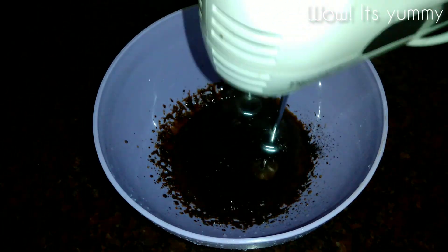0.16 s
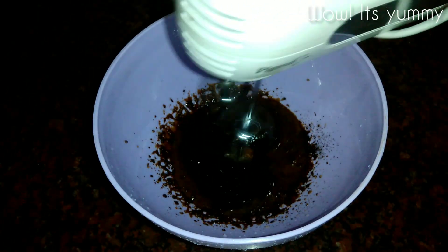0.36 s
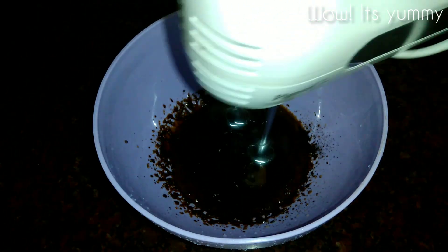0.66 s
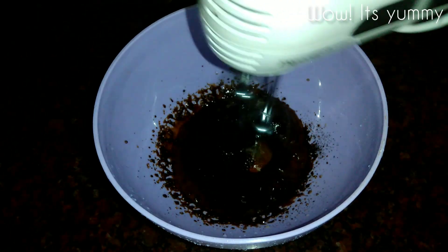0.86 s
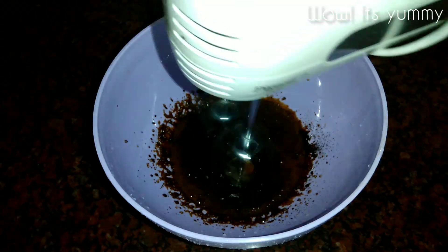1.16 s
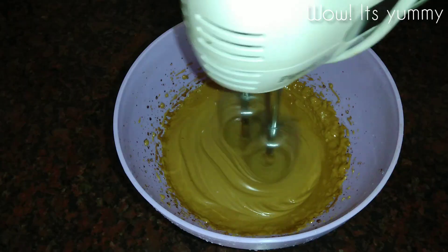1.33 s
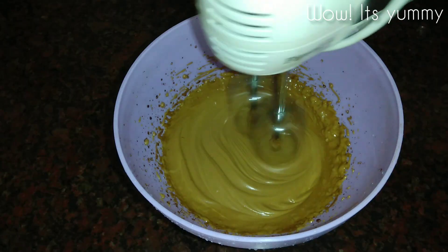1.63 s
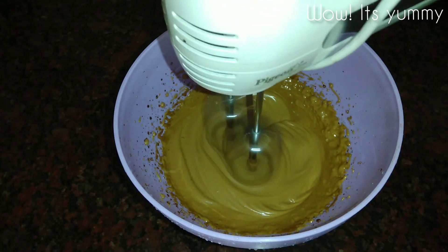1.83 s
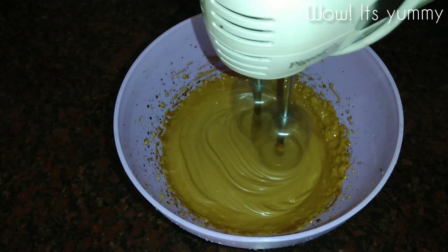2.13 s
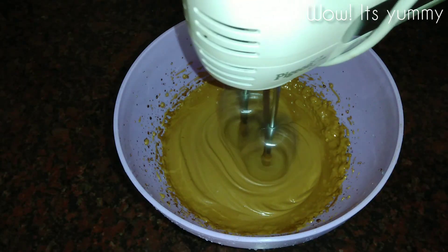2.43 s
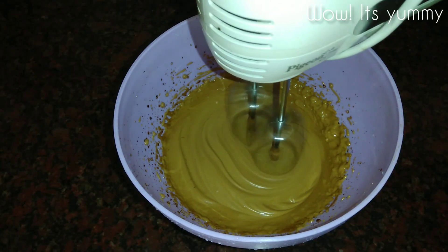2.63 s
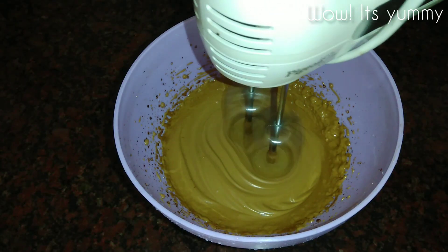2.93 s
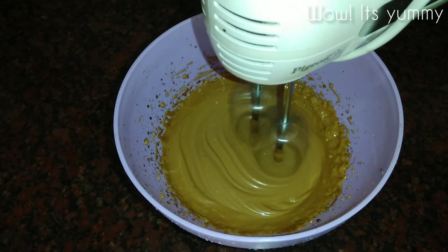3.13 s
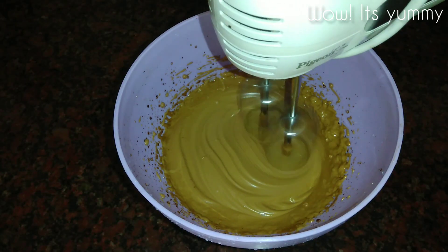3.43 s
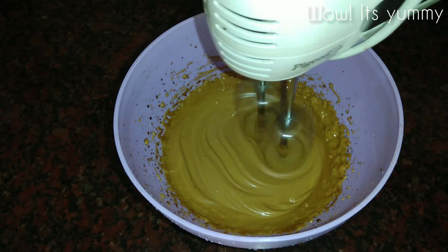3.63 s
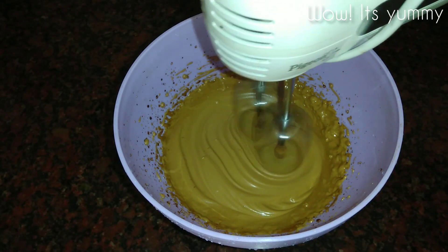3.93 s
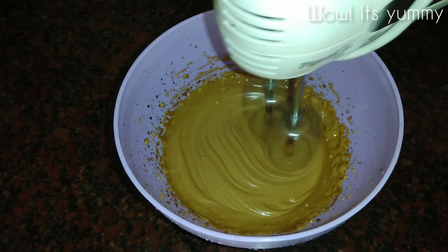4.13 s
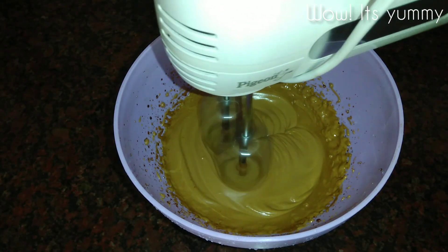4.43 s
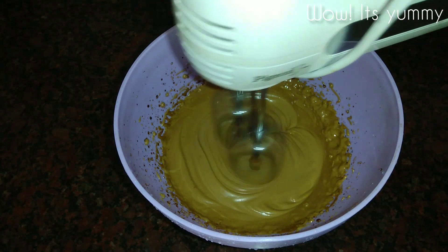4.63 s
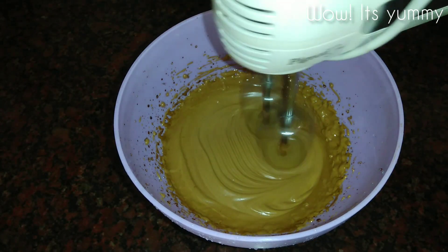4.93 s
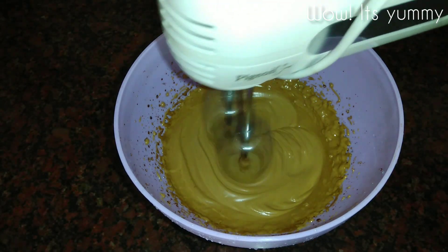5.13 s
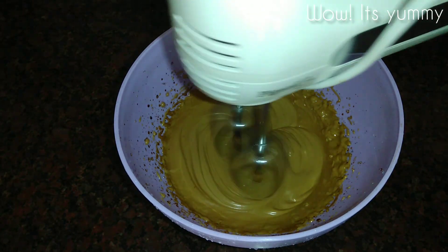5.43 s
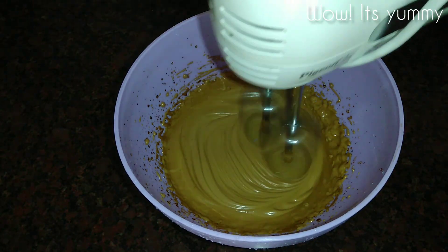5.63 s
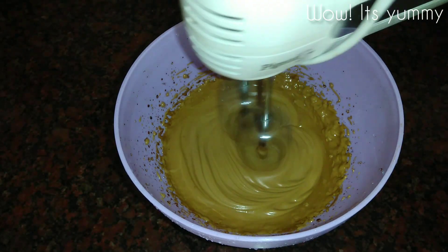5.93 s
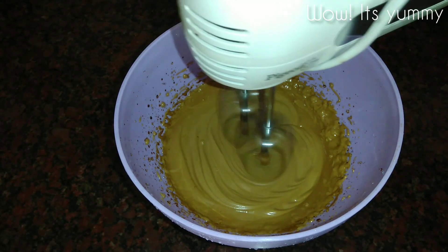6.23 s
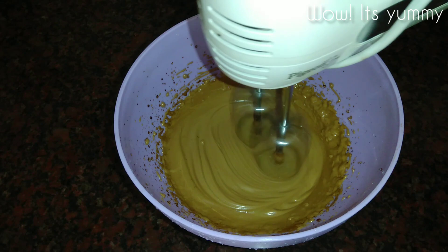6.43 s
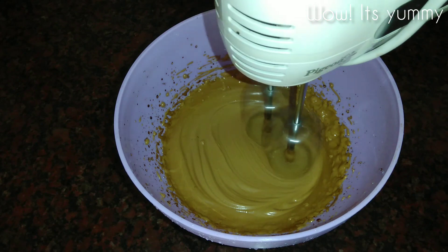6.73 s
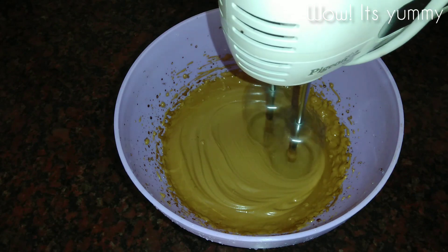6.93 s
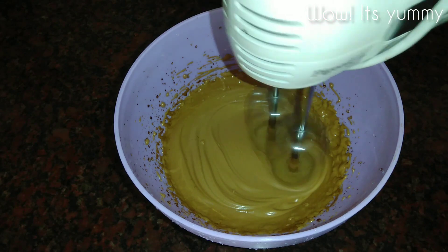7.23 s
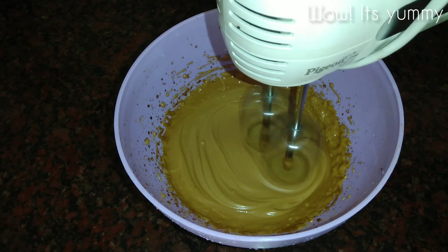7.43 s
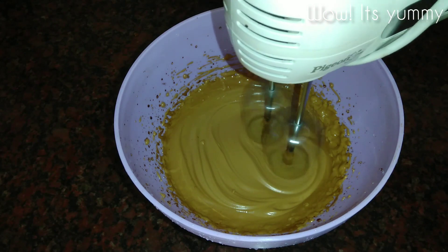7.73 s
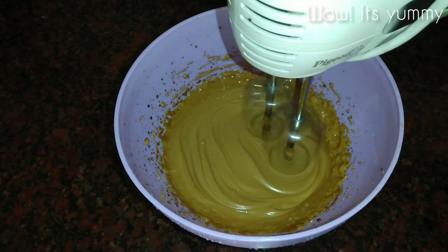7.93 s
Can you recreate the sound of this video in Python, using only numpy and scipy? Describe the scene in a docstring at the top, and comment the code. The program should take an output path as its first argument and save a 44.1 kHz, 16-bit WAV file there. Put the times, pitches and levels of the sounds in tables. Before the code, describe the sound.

From 0 to 1.19 s an electric hand mixer runs at low speed, close and dry in stereo: a soft motor drone near 272 Hz, gritty gear rattle and wet sloshing that surges several times a second, with small bubbly slaps. Beater wires knock on the plastic bowl in short hard ticks, strongest in a chattering cluster around 1.04 s. It cuts to near silence until about 1.27 s. Then the mixer fades in within a quarter second at top speed, far louder and brighter: a piercing, steady whine near 429 Hz with strong harmonics, throbbing about twenty times a second, dense gear buzz, airy brush hiss and low foam churn. Pitch barely sags; tone colour swells gently as the mixer moves. At 7.3 s a dull thud and faint click switch it off; the whine glides downward, hiss and buzz fading, still slowing at the end around 8 s.

```python
"""An electric hand mixer in a bowl, close by: rotor harmonics, gear clatter and brush hiss follow its rotor speed.
At low speed the beaters splash through thin liquid, heard as droplet-modulated noise and ringing air pockets,
and knock on the plastic bowl, heard as ticks and decaying modes. After a short silence it whips thick foam
at top speed with a bright throbbing whine, then is switched off and coasts down.
Steady motor hum, a switch thud and click, and a very faint noise floor complete the scene."""
import sys
import numpy as np
from scipy import signal
from scipy.fft import rfft, irfft, next_fast_len
from scipy.io import wavfile

SR = 44100
rng = np.random.default_rng(int(sys.argv[2]) if len(sys.argv) > 2 else 0)


def wav_record(signal):
    """Record a signal, one row per channel, as 16-bit PCM in the file named by sys.argv[1]."""
    frames = np.transpose(np.atleast_2d(signal))
    bounded = np.clip(frames, -1, 1)
    # unit amplitude maps onto the largest positive 16-bit level
    quanta = np.round(bounded * 32767).astype(np.int16)
    wavfile.write(sys.argv[1], SR, quanta)


N = 355870
TIME = np.arange(N) / SR

# rotor speed at top speed while powered, sagging where the foam drags: time_s, turns_hz
FAST_SPEED = [(1.27, 428.9), (1.68, 429.4), (2.04, 428.4), (3.66, 430.0), (4.38, 429.4), (4.6, 427.4),
              (5.1, 427.7), (5.55, 426.3), (6.18, 427.5), (6.5, 428.8), (6.95, 429.6), (7.08, 423.7),
              (7.33, 412)]
# strong rotor harmonics at free speed: multiple, level_db, load_db, place_db (per unit to the right), off_db,
# left_minus_right_db, load_pan_db, place_pan_db, left_lead_rad, throb_share, throb_lead_rad
STRONG_TONES = [(1, -42.5, 1.5, 2.1, -0.5, 8.5, -1.7, -0.5, 0.2, 0.078, 0.45),
                (2, -52.5, 1, -1, -9, -5.5, 4, -1.5, -2, 0.2, -2.3),
                (3, -43.5, -0.5, 0, -15, -8, -3, 6.5, 1.5, 0.25, -1.9),
                (4, -41, -2.5, 0.5, -15, 4.5, 0, 2, 1.0, 0.26, 0.53),
                (5, -49, 1, -1.5, -3.5, 11, -5, 2, 0.7, 0.23, 2.8),
                (6, -66, 2, 5, 10, 5, 0, -3, 0.5, 0.079, -0.42),
                (7, -47.5, 0, 0, -6, 4.5, 6, -.5, 0.5, 0.14, 1.8),
                (8, -51.5, 6, -2.5, 2.5, 0.2, 2.5, -1, 4, 0.052, -0.41)]
# swelling of the second harmonic as the mixer moves: time_s, gain_db
SECOND_SWELL = [(1.8, -13), (2.05, 4), (2.4, -7), (3.2, -0.5), (3.7, 3), (4.15, -1), (4.85, 4), (5.35, 3.5),
                (5.7, 7.5), (6.1, 5), (6.5, -4), (6.95, 1), (7.25, 7.5)]
# swelling of the third harmonic: time_s, gain_db
THIRD_SWELL = [(2.3, 0), (2.8, -2.5), (3.5, -2), (3.8, -3), (4.5, -1.5), (5.1, 2.5), (5.5, -1.5), (5.95, 3),
               (6.3, -1.5), (6.9, -3.5), (7.15, 3.5)]
# swelling of the seventh harmonic: time_s, gain_db
SEVENTH_SWELL = [(1.6, 0), (2.1, 0.5), (3.1, 1), (4.4, -1), (4.75, -11), (5.1, -1), (5.5, -23), (5.9, 0.5),
                 (6.25, -6), (6.5, 0), (6.9, -3), (7.2, -1)]
# weak top-speed harmonics, relative to the brush work level: multiple, relative_db, left_minus_right_db, left_lead_rad
WEAK_TONES = [(9, -17, -3, 1.5), (10, -18.5, -3, 1.44), (11, -22, 19, 1.8), (14, -18.5, -13, 1.4),
              (18, -15.5, 4, -1.1), (24, -9, -23, 2.3)]
# housing resonances and dips that tones slide through: centre_hz, width_hz, gain_db
HOUSING_MODES = [(246, 6, -10), (275, 20, 4), (294, 7, -10), (400, 7, -13), (419, 6, -15), (830, 18, 4),
                 (1256, 32, 7), (1640, 110, 5), (1930, 70, 7), (2050, 70, -4), (2600, 200, 7.5),
                 (2790, 60, -6), (2920, 70, -7), (3230, 120, 3)]
# place of the mixer in the bowl, negative left and positive right: time_s, place (no unit)
MIXER_PLACE = [(1.27, -2), (1.5, 0.14), (1.85, -1.5), (2.15, 0.013), (3, 0.32), (3.4, 0.92), (4.1, 0.5),
               (4.55, -0.036), (4.8, -0.084), (5.05, 0.38), (5.3, -0.13), (5.75, 1), (6.05, -0.9),
               (6.6, 0.074), (7, 0.59), (8, 0.24)]
# noises in the foam by part: base_level_db, load_db, loss_per_speed_halving_db, unevenness_db
FOAM_WORK_LEVELS = {"churn": (-47, 0.5, 8.5, 0.6), "gears": (-41.5, 0.54, 15.5, 0.74),
                    "brushes": (-42, -0.5, 26, 0.2), "bearings": (-43, 0.7, 28, 1.06)}
# gear spectrum, driven at top speed: frequency_hz, relative_level_db
FAST_GEAR_SPECTRUM = [(500, -15), (1000, 1), (1300, 3.5), (1500, 2.5), (1700, 8), (1950, 1), (2300, 3.5),
                      (2800, 3), (3300, 4), (3600, -10), (4100, -27), (8000, -49)]
# gear spectrum after switch-off: frequency_hz, relative_level_db
COASTING_GEAR_SPECTRUM = [(500, -14), (1000, -2), (1300, 2), (1650, 6), (2000, 4.5), (2550, 6),
                          (3100, -1.5), (4100, -3), (8000, -48)]
# brush spectrum at top speed: frequency_hz, relative_level_db
FAST_BRUSH_SPECTRUM = [(3000, -28), (4600, -32), (6500, -14), (7500, -15), (8600, -11.5), (9300, -4),
                       (10500, -2), (11500, -2), (12500, -5), (13600, -8.5), (14100, -10), (15200, -9.5),
                       (16000, -15)]
# bearing spectrum at top speed: frequency_hz, relative_level_db
BEARING_SPECTRUM = [(1500, -16), (3000, 1.5), (3800, 3), (4350, -4), (4900, 5), (5700, -1), (6800, 0.5),
                    (8200, 1), (9200, -1.5), (11000, -18), (16000, -31)]
# rough bearing tones between the rotor harmonics: multiple, width_hz, relative_db
RING_TONES = [(4.455, 6, -62), (7.4, 70, -60), (8.57, 70, -61), (11.5, 70, -65), (12.5, 60, -69),
              (14.5, 70, -66)]
# churning foam spectrum: frequency_hz, relative_level_db
FOAM_SPECTRUM = [(20, -47), (60, -26), (120, -14.5), (180, -2), (260, -2), (370, 7.5), (520, 6), (750, 3.5),
                 (1000, -4), (1500, -8), (3000, -15.5)]
# rotor speed in the liquid: time_s, turns_hz
SLOW_SPEED = [(0, 271), (.2, 272), (.35, 271.8), (.5, 273.1), (.8, 273.6), (.95, 274.9), (1.19, 273.3)]
# rotor harmonics at low speed: multiple, level_db, left_minus_right_db, left_lead_rad
SLOW_HARMONICS = [(1, -49, 3, 0), (6, -53.5, -1, .1), (7, -61, 0, -.5), (8, -61, 0, -1.8), (12, -64, 7, -2),
                  (36, -64, -5, -1.3)]
# surges as the beaters sweep through the pool: hold_start_s, hold_length_s, churn_lift_db, rattle_lift_db
POOL_SURGES = [(0.0, 0.092, 6.5, 1.5), (0.18, 0.081, 7, 3.5), (0.325, 0.017, 5, 1), (0.403, 0.11, 6.5, 2),
               (0.579, 0.029, 9.5, 5), (0.67, 0.047, 7.5, 6), (0.76, 0.058, 5, 3.5), (0.82, 0.051, 6.5, -1),
               (0.927, .03, 4, -3), (1.04, 0.063, 10.5, 5.5), (1.137, 0.046, 9.5, 3)]
# splashing liquid spectrum: frequency_hz, relative_level_db
LIQUID_SPECTRUM = [(20, -37), (50, -31), (75, -21), (130, -21), (235, -13), (310, -3.5), (560, -6.5),
                   (780, -5), (1000, -11), (1300, -22), (2500, -27.5)]
# gear spectrum at low speed: frequency_hz, relative_level_db
SLOW_GEAR_SPECTRUM = [(100, -41), (500, -19), (1150, -5.5), (1620, 3), (1900, 3), (2200, 3), (2700, -5),
                      (3300, -2), (4500, -43), (6000, -22), (9000, -13.5)]
# brush spectrum at low speed: frequency_hz, relative_level_db
SLOW_BRUSH_SPECTRUM = [(150, -25), (1000, 0), (2500, 4), (4500, -1), (6500, -4), (8300, -7), (9900, 1),
                       (11300, 3), (12500, -13), (13300, 0), (14500, -18), (16000, -10)]
# liquid thrown against the wall: start_s, relative_db, starting_pitch_hz
LIQUID_SLAPS = [(0.063, -24, 536), (0.189, -32, 810), (0.212, -29, 864), (0.244, -28, 740),
                (0.331, -25, 740), (0.381, -35, 730), (0.403, -22.5, 726), (0.428, -21.5, 725),
                (0.447, -24, 530), (0.593, -26, 670), (0.604, -35, 560), (0.678, -26, 480),
                (0.687, -26, 555), (0.71, -22, 560), (0.737, -24, 475), (0.842, -29, 576),
                (0.865, -29, 575), (0.941, -27, 750), (1.095, -24, 950), (1.177, -34, 727)]
# beater knocks on the bowl: start_s, ring_peak_db, tick_relative_db
BEATER_KNOCKS = [(.0847, -31, -12), (.2448, -28, -18), (.4065, -29.5, -14), (.4633, -31, -14),
                 (.4728, -29, -15), (.524, -35, -12), (.604, -30, -12), (.6799, -28, -18), (.689, -32, -13),
                 (.7612, -32, -13), (.7951, -32, -9), (.805, -32, -4), (1.0351, -20.5, -11),
                 (1.0386, -22.5, -15), (1.0521, -26, 0), (1.0552, -30, -4), (1.058, -34, 2),
                 (1.064, -36, -1), (1.0958, -25, -17), (1.103, -33, -15), (1.117, -33, -18),
                 (1.1783, -29, -1)]
# modes of the bowl and beater wire: frequency_hz, relative_db, t60_s
BOWL_MODES = [(496, -15, 0.06), (734, -9, 0.055), (1100, -11, .03), (1700, -5, .024), (2165, -2, 0.028),
              (2514, 0, 0.026), (3031, -6, 0.025), (4048, -15, 0.035), (4667, -15, 0.036),
              (6584, -24, 0.04), (11000, -14, .012)]
# steady tones of motor iron and housing: pitch_hz, width_hz, slow_level_db, fast_base_level_db, off_db
HUM_TONES = [(100.3, 2, -85, -79.5, -9), (200.6, 2.3, -60.5, -72, -10), (575.6, 22, -52.5, -57.5, 0)]
# likeness of left and right: frequency_hz, correlation
STEREO_LIKENESS = [(30, 0.067), (130, 0.7), (290, 0.84), (640, 0.034), (1410, 0.28), (3100, 0.43),
                   (7000, 0.15), (15000, 0.037)]

SLOW_END_S, FAST_START_S = 1.189, 1.266
FADE_FROM_S, FADE_S = 1.243, 0.24  # the top-speed sound fades in
FREE_HZ, SAG_HZ = 429.4, 2.16  # free-running speed, and the sag that means full load
OFF_S, COAST_PER_S, RELEASE_S = 7.33, 0.707, 0.21  # power off, slowing rate, dying of the magnetic whine
SWITCH_S, THUD_DB, CLICK_DB = 7.312, -55, -36
STROKES_PER_S = 8  # how often the drag on the beaters changes
WHINE_DB_PER_HALVING, WHINE_WANDER_DB, WANDERS_PER_S = 20.5, 0.7, 5
SMEAR_RAD = 0.086  # the housing delays the tones unequally, which blunts the pulse of each turn
CALM_CHURN_DB, CALM_GEARS_DB, CALM_BRUSHES_DB = -48, -47, -44  # between surges
SURGE_ATTACK_S, SURGE_RELEASE_S = 0.021, 0.048
BRUSH_SHARE = 0.21  # how far the brush hiss follows the rattle
CONTACT_S, TICK_S, CHATTER_PER_S = 0.0003, 0.0014, 240  # wire pressing on the bowl, tick decay, bounce rate
LEFT_LAG_S = 0.000113
TOP_HZ = 15750


def whipping_foam():
    """Harmonic radiation and friction noise: rotor speed and foam load set the levels at top speed."""
    hz = curves(FAST_SPEED)[0] * np.exp(-COAST_PER_S * np.maximum(TIME - OFF_S, 0))
    load = np.clip((FREE_HZ - hz) / SAG_HZ, 0, 1)
    halvings = np.log2(FREE_HZ / hz)
    off = np.clip((TIME - OFF_S) / RELEASE_S, 0, 1) ** 2
    # as the rotor slows, the parts stop pressing on each other and the noise loses its pitch
    press = (hz / hz.max()) ** 5
    rotor, beater = shafts(hz, jitter=0.016)
    work = foam_work(load, halvings)
    work_gain = {part: undb(db) for part, db in work.items()}

    tones = whine(hz, rotor, beater, load, halvings, off, press)
    weak_tones = overtones(hz, rotor, press) * work_gain["brushes"]
    gears = fast_gears(hz, rotor, beater, press, off) * work_gain["gears"]
    brushes, bearings = fast_friction(hz, rotor, press)
    brushes = brushes * work_gain["brushes"]
    bearings = bearings * work_gain["bearings"]
    rings = bearing_rings(rotor) * press * undb(-1.5)
    foam = churning_foam() * work_gain["churn"]
    body = hum(1, off) * undb(work["churn"] - np.median(work["churn"]))
    return tones + weak_tones + gears + brushes + bearings + rings + foam + body + switch()


def whine(hz, rotor, beater, load, halvings, off, press):
    """Amplitude-modulated harmonics: the beaters throb the rotor tones and the housing resonances colour them."""
    place, = curves(MIXER_PLACE)
    swells = {2: curves(SECOND_SWELL)[0], 3: curves(THIRD_SWELL)[0], 7: curves(SEVENTH_SWELL)[0]}
    flutter_db = 0.08 + 1.4 * (1 - press) ** 2  # the tones flutter as the rotor slows
    total = 0
    for (k, db, load_db, place_db, off_db, pan_db, load_pan_db, place_pan_db,
         lead, throb, throb_lead) in STRONG_TONES:
        steady_db = db + load_db * load + place_db * place + off_db * off
        steady_db = steady_db - WHINE_DB_PER_HALVING * halvings + housing(k * hz)
        waver_db = swells.get(k, 0) + WHINE_WANDER_DB * walk(WANDERS_PER_S)
        waver_db = waver_db + flutter_db * np.sqrt(k) * walk(22)
        # each tone beams its own way, so it shifts between the microphones as the mixer moves
        pan = (pan_db + load_pan_db * load + place_pan_db * place) * (1 - 0.55 * off)
        throbbing = unit(1 + throb * np.cos(beater + throb_lead))
        total = total + undb(steady_db + waver_db) * throbbing * tone(k * rotor + SMEAR_RAD * k ** 2, pan, lead)
    return total


def overtones(hz, rotor, press):
    """Weak high harmonics: phase jitter grows with the multiple, and slowing weakens the highest most."""
    total = 0
    for k, db, pan, lead in WEAK_TONES:
        gain = undb(db + housing(k * hz) + 2 * walk(9)) * press ** (k / 50)
        total = total + gain * tone(k * rotor + 0.02 * k * walk(70), pan, lead)
    return total


def housing(hz):
    """Resonant transfer: each housing peak or dip changes a tone's level in dB near its centre frequency."""
    return sum(db / (1 + (2 * (hz - centre) / width) ** 2) for centre, width, db in HOUSING_MODES)


def shafts(hz, jitter):
    """Phase integration: rotor and geared beater angles, with a load ripple in the rotor once a beater turn."""
    rotor = 2 * np.pi * np.cumsum(hz) / SR
    worm_ratio, ripple_rad = 21.4, 0.075
    beater = rotor / worm_ratio + 0.25 * walk(5)
    return rotor + ripple_rad * np.cos(beater) + jitter * walk(70), beater


def foam_work(load, halvings):
    """Mechanical work: load, slowing and uneven drag change the level in dB of each noisy part."""
    drag = walk(STROKES_PER_S)
    return {part: db + load_db * load - slowing_db * halvings + uneven_db * drag
            for part, (db, load_db, slowing_db, uneven_db) in FOAM_WORK_LEVELS.items()}


def fast_gears(hz, rotor, beater, press, off):
    """Tooth meshing: noise rasps once a rotor turn and ticks at random, then changes colour when undriven."""
    ticks = 1 + bursts(rate=650, spread_db=2.3, decay_s=0.0012)
    mesh = (1 + 0.12 * np.cos(beater)) * (1 + 0.35 * np.cos(rotor)) * ticks
    teeth = rubbing(hz, memory=0.15 * press) * mesh
    driven = radiate(teeth, FAST_GEAR_SPECTRUM, pan_db=-0.4)
    coasting = radiate(teeth, COASTING_GEAR_SPECTRUM, pan_db=-2.5)
    return np.cos(off * np.pi / 2) ** 2 * driven + np.sin(off * np.pi / 2) ** 2 * coasting


def fast_friction(hz, rotor, press):
    """Sliding friction: brushes and bearings share a crackle that pulses twice a rotor turn."""
    crackle = undb(1.0 * walk(900))
    sparks = crackle * (1 + 0.061 * np.cos(2 * rotor)) * undb(0.55 * walk(25))
    brush_rub = rubbing(hz, memory=0.062 * press) * sparks
    bearing_rub = rubbing(hz, memory=0.57 * press) * sparks
    brushes = radiate(brush_rub, FAST_BRUSH_SPECTRUM, pan_db=-1.2) * undb(3.0)
    return brushes, radiate(bearing_rub, BEARING_SPECTRUM, pan_db=-1.0)


def bearing_rings(rotor):
    """Narrow-band modulation: the bearings sing roughly in between the multiples of the rotor speed."""
    total = 0
    for k, width, db in RING_TONES:
        roughness = unit(0.5 + walk(width))
        total = total + undb(db) * roughness * tone(k * rotor + walk(width), 0, rng.normal(0, 1))
    return total


def churning_foam():
    """Turbulent noise: a steady wash with random bursts takes on the broad spectrum of the foam."""
    wash = noise() * (1.0 + 0.35 * bursts(rate=110, spread_db=3, decay_s=0.0075))
    return radiate(wash, FOAM_SPECTRUM, pan_db=2.5)


def stirring_liquid():
    """Forced agitation: a soft motor drone under splashing and gritty rattling, which grow with the surges."""
    hz, = curves(SLOW_SPEED)
    wash_db, rattle_db = surges()
    rotor, beater = shafts(hz, jitter=0.024)
    droplets = 0.9 + bursts(rate=220, spread_db=2, decay_s=0.003)
    splash = radiate(noise() * droplets, LIQUID_SPECTRUM, pan_db=1.5) * undb(CALM_CHURN_DB + wash_db)
    grit = 0.8 + bursts(rate=380, spread_db=2.8, decay_s=0.0011)
    rattle = rubbing(hz, memory=0.12) * grit
    gears = radiate(rattle, SLOW_GEAR_SPECTRUM, pan_db=-0.5) * undb(CALM_GEARS_DB + rattle_db)
    brush_db = CALM_BRUSHES_DB + BRUSH_SHARE * rattle_db + 0.62 * walk(150) + 0.88 * walk(700)
    brushes = radiate(rubbing(hz, memory=0.35), SLOW_BRUSH_SPECTRUM, pan_db=-3.0) * undb(brush_db)
    return drone(rotor, beater) + splash + gears + brushes + hum(0, off=False) + slaps() + knocks()


def drone(rotor, beater):
    """Shaft modulation: shudder smears the high harmonics most, and two wire loops load each beater turn."""
    blades = 1 + 0.079 * np.cos(2 * beater)
    shudder = 0.085 * walk(110)
    total = 0
    for k, db, pan, lead in SLOW_HARMONICS:
        gain = undb(db + 1.5 * np.sqrt(k) * walk(29.34))
        total = total + gain * tone(k * rotor + k ** 0.86 * shudder, pan, lead)
    return total * blades


def surges():
    """Envelope control: churn and rattle lifts rise quickly, hold and ebb, the largest lift prevailing."""
    lifts_db = []
    for start, length, *lifts in POOL_SURGES:
        rise = 1 + (TIME - start) / SURGE_ATTACK_S
        ebb = 1 - (TIME - start - length) / SURGE_RELEASE_S
        lifts_db.append(np.outer(lifts, np.clip(np.minimum(rise, ebb), 0, 1)))
    return np.max(lifts_db, axis=0)


def slaps():
    """Impact and cavity resonance: each slap is a short wet crack with a rising air pocket ringing in it."""
    out, t = np.zeros((2, N)), TIME[:2048]
    for start, db, hz in LIQUID_SLAPS:
        pocket = tone(2 * np.pi * hz * t * (1 + 6 * t), 2.1, rng.normal(-0.43, 0.35)) * np.exp(-t / 0.0059)
        crack = band_noise(len(t), [500, 2800]) * np.exp(-t / 0.0044)
        first = int(start * SR)
        out[:, first:first + len(t)] += undb(db) * (0.27 * pocket + 0.26 * crack)
    return out


def knocks():
    """Modal impact: a beater wire excites decaying bowl modes, a hard tick and brief bouncing chatter."""
    out, t = np.zeros((2, N)), TIME[:4096]
    for start, db, tick_db in BEATER_KNOCKS:
        ring = 0
        for hz, mode_db, t60 in BOWL_MODES:
            mode = tone(2 * np.pi * hz * t * rng.normal(1, 0.033), 0, rng.normal(0, 1))
            ring = ring + undb(mode_db - 60 * t / t60) * mode
        ring = ring * np.minimum(t / CONTACT_S, 1)
        tick = band_noise(len(t), [700, 13000]) * np.exp(-t / TICK_S)
        # irregular bounces, each a sharp onset that decays
        bounces = np.cumsum(rng.exponential(1, len(t)) ** 4 / 24) * CHATTER_PER_S / SR
        bouncing = unit(np.exp(-3 * (bounces % 1)))
        chatter = band_noise(len(t), [1800, 6500]) * bouncing * np.exp(-t / 0.013)
        strike = ring / np.abs(ring).max() + undb(tick_db) * (0.8 * tick + 0.6 * chatter)
        first = int(start * SR)
        out[:, first:first + len(t)] += undb(db) * strike
    return out


def switch():
    """Impulsive excitation: pushing the switch to off gives a dull thud in the handle and a faint click."""
    t = np.maximum(TIME - SWITCH_S, 0)
    # spectra: frequency_hz, relative_level_db
    thud_spectrum = [(25, -6), (70, 5), (160, -3.5), (500, -30), (2000, -60)]
    click_spectrum = [(300, -21.5), (1500, 0), (3000, 0), (5000, -8), (14000, -6)]
    thud = radiate(noise(), thud_spectrum, pan_db=5) * np.exp(-t / 0.025)
    click = radiate(noise(), click_spectrum, pan_db=0) * np.exp(-t / 0.008)
    return (TIME > SWITCH_S) * (undb(THUD_DB) * thud + undb(CLICK_DB) * click)


def hum(column, off):
    """Steady vibration: narrow tones of the motor body wander slightly, and the mains hum drops with the power."""
    total = 0
    for hz, width, *levels_db, off_db in HUM_TONES:
        gain = undb(levels_db[column] + off_db * off) * unit(1 + 0.56 * walk(width))
        total = total + gain * tone(2 * np.pi * hz * TIME + 1.0 * walk(2 * width), 2.7, 0)
    return total


def noise_floor():
    """Stationary noise: a very faint background has the broad spectrum of the foam."""
    return undb(-98) * radiate(noise(), FOAM_SPECTRUM, pan_db=0)


def rubbing(hz, memory):
    """Comb filtering: noise partly repeating on later shaft turns has broad peaks at multiples of the speed."""
    fresh, out, power = noise(), 0, 0
    for turn in range(6):
        weight = (turn + 1) * np.clip(memory, 0, 0.6) ** turn
        delayed = np.array([np.interp(TIME - turn / hz, TIME, channel) for channel in fresh])
        out = out + weight * delayed
        power = power + weight ** 2
    return out / np.sqrt(power)


def bursts(rate, spread_db, decay_s):
    """Shot-noise envelope: many short random bursts decay, a few much larger than the rest."""
    chance, size = rng.random(N), rng.standard_normal(N)
    kicks = (chance < rate / SR) * undb(spread_db * np.clip(size, -2, 2)) ** 2
    energy = signal.lfilter([1], [1, -np.exp(-2 / (decay_s * SR))], kicks + 1e-18)
    return unit(np.sqrt(energy))


def tone(phase, pan_db, lead):
    """Interaural difference: a partial of rms 1 has its own level and phase at each microphone."""
    gains = undb([pan_db / 2, -pan_db / 2]).reshape(2, -1)
    gains = gains / np.sqrt(np.mean(gains ** 2, axis=0))
    return np.sqrt(2) * gains * np.cos([phase + lead / 2, phase - lead / 2])


def radiate(x, spectrum, pan_db):
    """Partial coherence: coloured noise is partly shared by the microphones and reaches the left a little later."""
    size = next_fast_len(N)
    f = np.arange(size // 2 + 1) * SR / size
    db = on_log_axis(f, spectrum)
    alike = np.clip(on_log_axis(f, STEREO_LIKENESS), -1, 1)
    mid, side = rfft(x, size) * undb(db) * np.sqrt([1 + alike, 1 - alike])
    left = (mid + side) * undb(pan_db) * np.exp(-2j * np.pi * f * LEFT_LAG_S)
    return unit(irfft(np.array([left, mid - side]), size)[:, :N])


def on_log_axis(f, table):
    """Logarithmic interpolation: a table's values are read between its frequencies."""
    hz, values = np.transpose(table)
    return np.interp(np.log(f + 1), np.log(hz), values)


def band_noise(length, edges_hz):
    """Band-pass filtering: unrelated stereo noise is kept between two frequencies."""
    return signal.lfilter(*signal.butter(2, edges_hz, "band", fs=SR), rng.standard_normal((2, length)))


def noise():
    """Incoherence: white noise is unrelated at left and right."""
    return rng.standard_normal((2, N))


def walk(rate):
    """Random modulation: a wander of rms 1 runs in straight lines between random knots, rate per second."""
    knots = rng.standard_normal(8192)
    return unit(np.interp(TIME * rate, np.arange(len(knots)), knots))


def curves(table):
    """Linear interpolation: each column of a timed table is read sample by sample."""
    times, *columns = np.transpose(table)
    return [np.interp(TIME, times, column) for column in columns]


def undb(db):
    """Logarithmic level: decibels become an amplitude gain."""
    return 10 ** (np.asarray(db) / 20)


def unit(x):
    """Power normalisation: a signal is scaled to rms 1."""
    return x / np.sqrt(np.mean(x ** 2))


def scene():
    """Superposition: low speed, a short silence, then top speed fading in, over the noise floor."""
    slow_gate = np.clip((SLOW_END_S - TIME) / 0.002, 0, 1)
    fast_gate = np.clip((TIME - FAST_START_S) / 0.004, 0, 1)
    fade = np.clip((TIME - FADE_FROM_S) / FADE_S, 0, 1)
    return fast_gate * fade * whipping_foam() + slow_gate * stirring_liquid() + noise_floor()


def record(dry):
    """Low-pass filtering: the recorder cuts the top of the spectrum steeply."""
    return signal.sosfilt(signal.ellip(10, 0.1, 70, TOP_HZ, fs=SR, output="sos"), dry)


dry = scene()
out = record(dry)
wav_record(out)
```